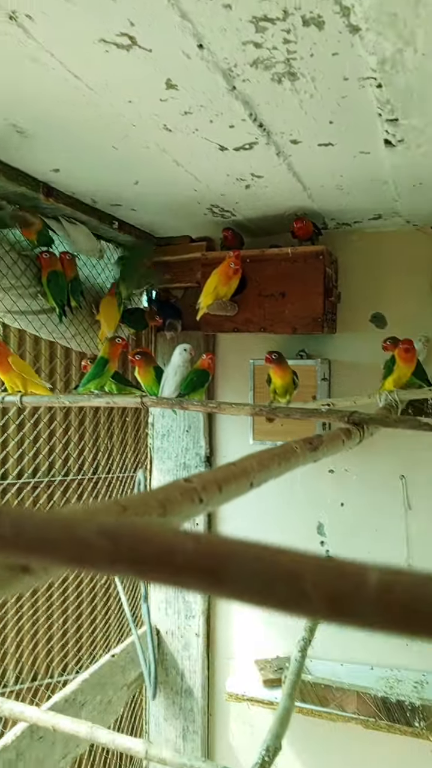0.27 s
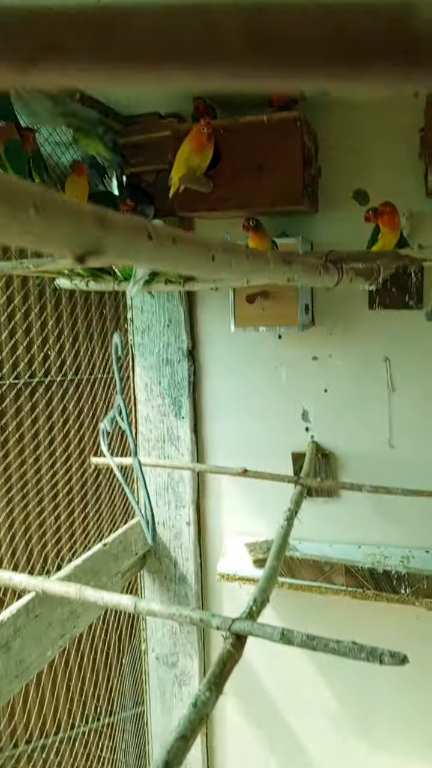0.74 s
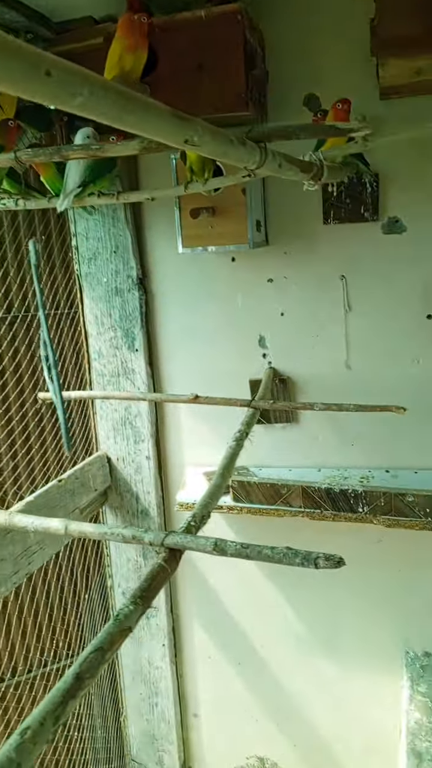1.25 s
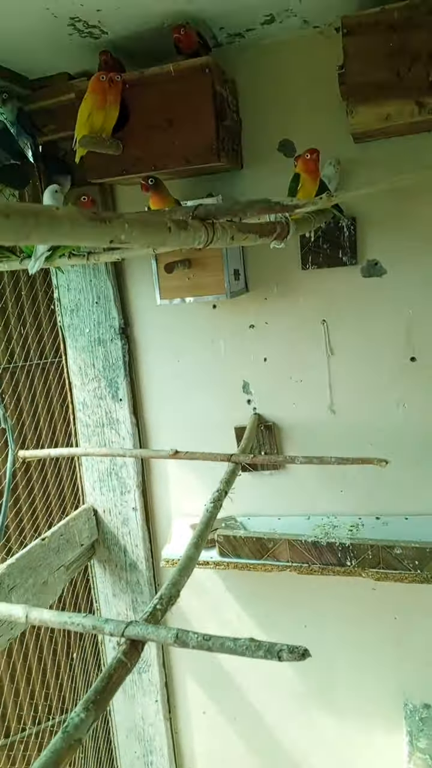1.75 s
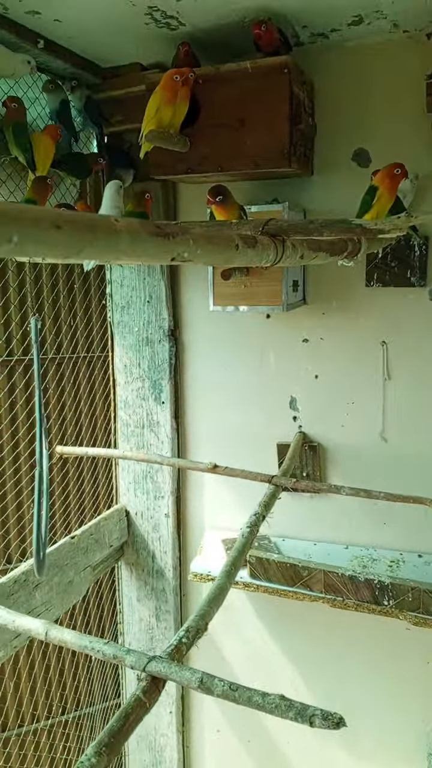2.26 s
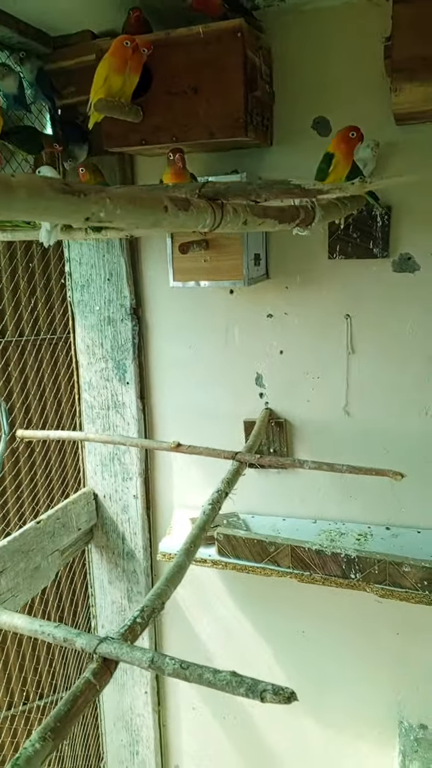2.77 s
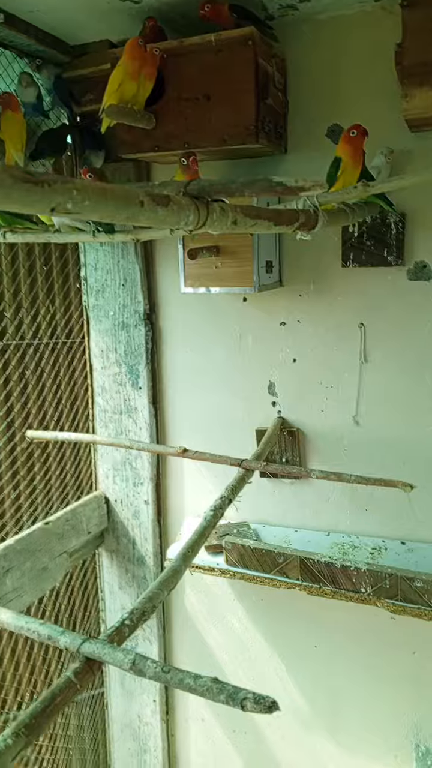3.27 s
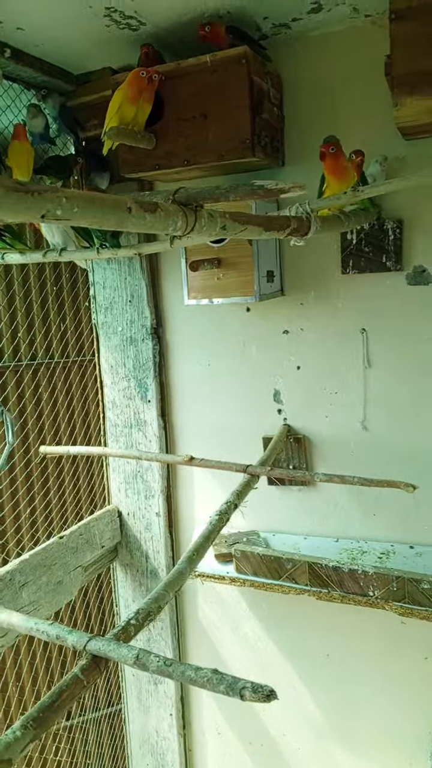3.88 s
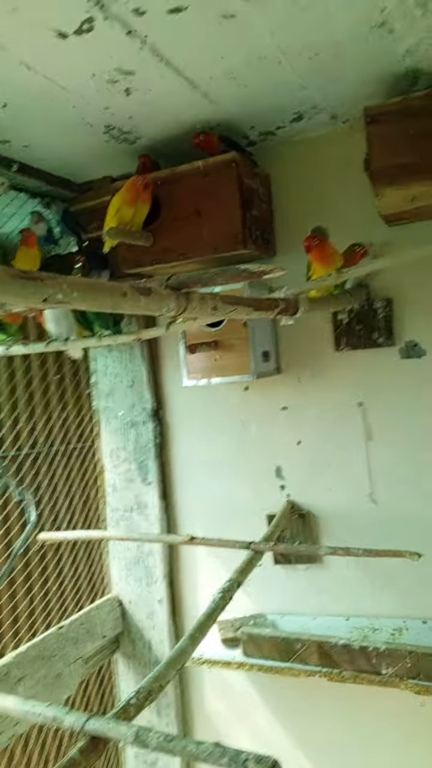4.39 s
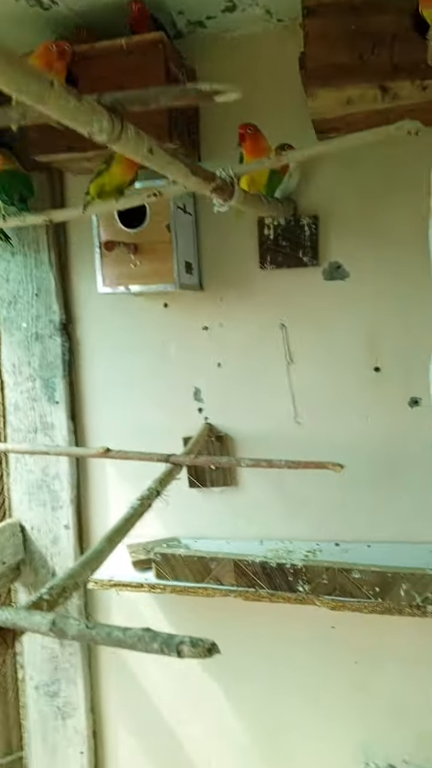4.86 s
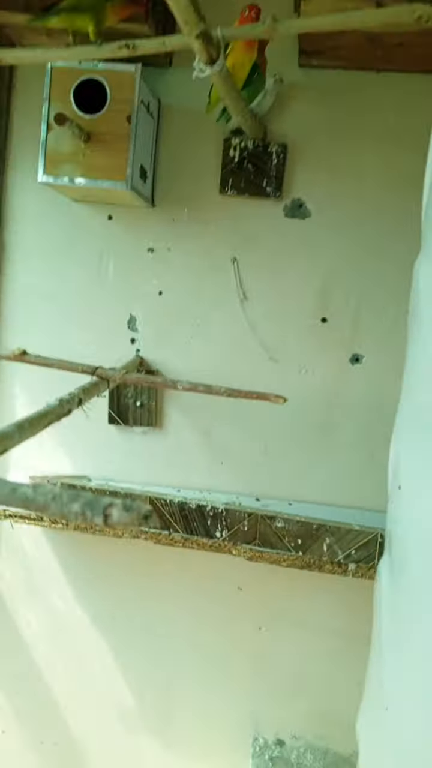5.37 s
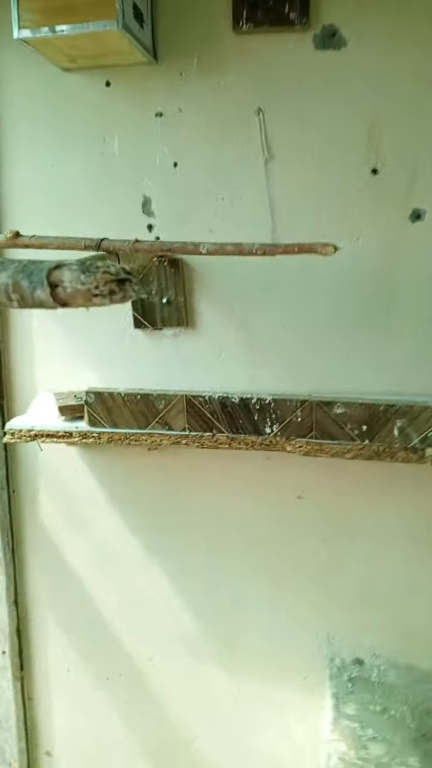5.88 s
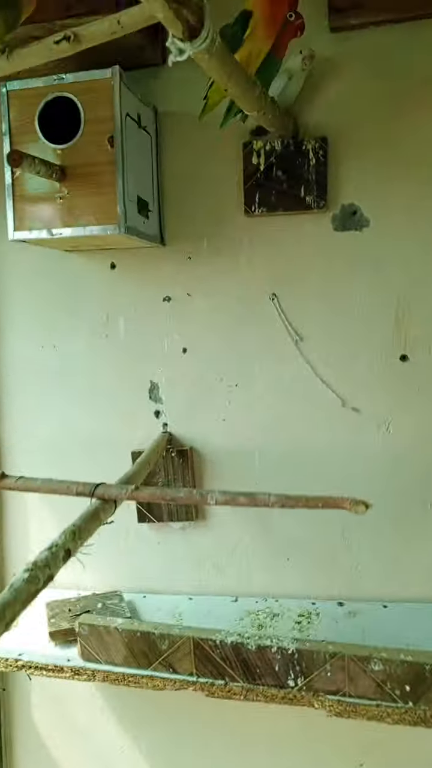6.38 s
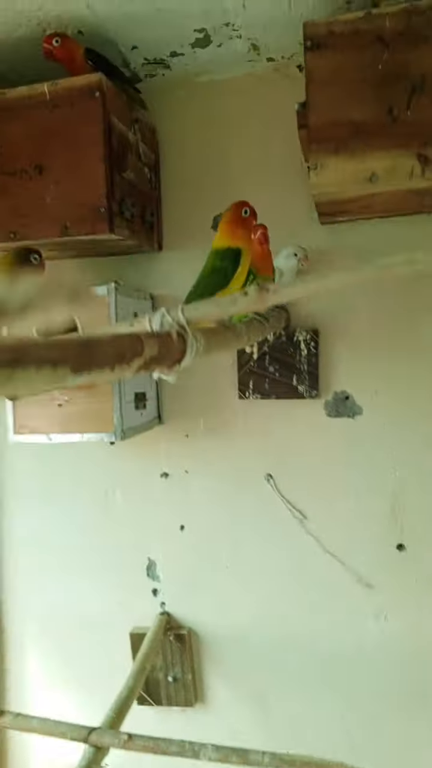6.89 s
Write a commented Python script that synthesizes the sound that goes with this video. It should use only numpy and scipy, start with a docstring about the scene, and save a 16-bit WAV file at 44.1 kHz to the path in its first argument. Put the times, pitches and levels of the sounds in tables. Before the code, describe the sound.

A small bare-walled aviary with a short, bright echo and a low, wavering room murmur. Two faint wing flicks come first, then from about 0.3 s small parrots chatter: a hoarse burst, then brief squawks mixed with chirps leaping up to a thin whistle near 6 kHz. Between 1.4 and 2.3 s it is dense and raspy; from 2.3 to 3.6 s short, nasal squawks follow in quick succession, with faint wooden ticks and soft feather rustle. From 3.7 to 4.4 s one bird gives nine even falling yaps, about eleven a second, ending in a squawk and chirp. Then calls thin out: wing flicks near 5 s, a sharp chirp at 5.2, a microphone click at 5.4, a squawk at 5.7. Low grip rumble swells around 5.9 and 6.5 s, the latter with fluttering feathers. A strong chirp at 6.8 s, a rattling trill at 6.95 and a loud final chirp end it.

```python
"""A bare-walled aviary: small parrots chatter with harsh squawks, falling yaps, chirps that shoot up to a
whistle, and one trill. Every call is a stack of shaky overtones with breath noise, and wall echoes smear it.
Wings are puffs of noise over a soft rustle; ticks and bumps on perches and microphone are clicks that ring.
A hand-held microphone rumbles over a low room murmur, both made of shaped noise that rises and falls."""
import sys
import numpy as np
from scipy import signal
from scipy.fft import rfft, irfft
from scipy.io import wavfile

SR = 44100
rng = np.random.default_rng(int(sys.argv[2]) if len(sys.argv) > 2 else 0)


def unload_audio(sound):
    """Save the sound as a 16-bit wav file, at the path given as the first command line argument."""
    columns = np.transpose(np.atleast_2d(sound))
    # keep every value between -1 and 1, then stretch to whole-number steps
    steps = np.round(np.clip(columns, -1, 1) * 32767)
    wavfile.write(sys.argv[1], SR, steps.astype(np.int16))


def nominal_scale(level):
    """Amplitude ratio for a level in decibels (scalar or array-like)."""
    x = np.asarray(level, float) / 20
    return 10 ** x


N = 314874   # length in samples


def rms_one(x):
    """Scale a signal to an average strength (rms) of 1."""
    return x / np.sqrt(np.mean(x ** 2) + 1e-20)


def in_time(rows):
    """Join the points of a (t/s, value) table by straight lines, one value a sample."""
    t, values = np.transpose(rows)
    return np.interp(np.arange(N) / SR, t, values)


def at_hz(points, hz):
    """Read a table at any frequency, along a logarithmic frequency axis."""
    table_hz, values = np.transpose(points)
    return np.interp(np.log(hz), np.log(table_hz), values)


def wobble(rate_hz):
    """Random drift: noise smoothed by two equal low-pass steps, scaled to rms 1."""
    r = np.exp(-2 * np.pi * rate_hz / SR)
    return rms_one(signal.lfilter([1], [1, -2 * r, r * r], rng.standard_normal(N)))


def coloured(spectrum, low_hz, high_hz):
    """Noise shaped by a spectrum table; its part between the two edges has rms 1."""
    hz = np.fft.rfftfreq(N, 1 / SR) + 1
    lines = rfft(rng.standard_normal(N)) * nominal_scale(at_hz(spectrum, hz))
    inside = irfft(lines * (hz > low_hz) * (hz < high_hz), N)
    return irfft(lines, N) / np.std(inside)


# loudness of the room murmur: (t/s, level/dB)
MURMUR_LEVEL = [(0.0, -64.5), (0.38, -56.5), (4.83, -58.5), (4.97, -60), (6.14, -60.5), (7.14, -50)]
# tone colour of the room murmur: (f/Hz, relative level/dB)
MURMUR_COLOUR = [(88, -26), (150, -7), (702, -9), (998, -9), (1760, -16.5), (2810, -19), (4670, -23),
                 (10800, -25.5), (12400, -31), (16000, -69)]


def room_murmur():
    """The room's background is mostly low noise whose level drifts at random."""
    level_db = in_time(MURMUR_LEVEL) + 3.1 * wobble(11.0)
    return nominal_scale(level_db) * coloured(MURMUR_COLOUR, low_hz=289.7, high_hz=1400)


# steady rumble of the hand on the microphone: (t/s, level/dB)
HAND_LEVEL = [(0.0, -67), (.87, -56.5), (.95, -67), (3.5, -72.5), (4.73, -56), (4.95, -70), (6.4, -58.5),
              (6.7, -55.5), (7.14, -55)]
# shifts of the grip, each a short swell of rumble: (t/s, level/dB)
GRIP_SHIFTS = [(3.25, -59), (3.4, -58), (5.375, -55), (5.53, -64), (5.84, -52), (5.95, -48), (6.14, -52.5),
               (6.33, -59), (6.56, -43), (6.98, -56)]
# tone colour of the rumble: (f/Hz, relative level/dB)
RUMBLE_COLOUR = [(15, -54), (25, -23), (92, 0.5), (151, -6.5), (306, -10), (336, -20.5), (400, -9.5),
                 (520, -52), (880, -120)]
GRIP_S = 0.031   # from the top of a swell down to 1/e


def handling():
    """A hand rubbing the microphone makes low noise, which swells whenever the grip shifts."""
    t = np.arange(N) / SR
    swells = sum(nominal_scale(db) * np.exp(-((t - s) / GRIP_S) ** 2) for s, db in GRIP_SHIFTS)
    loudness = nominal_scale(in_time(HAND_LEVEL)) + swells
    unsteady = nominal_scale(2.3 * wobble(29.0))
    return loudness * unsteady * coloured(RUMBLE_COLOUR, low_hz=40, high_hz=150)


# wing flicks: (t/s, level/dB)
WING_FLICKS = [(0.0986, -50), (.151, -49), (4.789, -54), (4.904, -52), (5.088, -57.5), (5.1285, -52),
               (5.578, -50.5), (5.78, -45), (5.8194, -58.5), (6.463, -45), (6.4946, -52), (6.5198, -44),
               (6.595, -49), (6.665, -47)]
# soft rustle in the treble between the calls: (t/s, level/dB)
RUSTLE_LEVEL = [(0, -67), (.2, -65), (.5, -57.5), (4.4, -53), (4.7, -59.5), (4.95, -55), (5.05, -97),
                (5.6, -61), (5.85, -57), (6.1, -87), (6.42, -79), (6.5, -55.5), (6.8, -67)]
# tone colour of the feathers: (f/Hz, relative level/dB)
FEATHER_COLOUR = [(290, -36.5), (500, -14), (1650, -0.5), (1990, -7.5), (2680, -2), (5780, -14),
                  (10700, -13), (15000, -35.5)]


def wings():
    """Feathers rub the air: each flick is a fast-dying puff of noise over a softer rustle."""
    flicks = np.zeros(N)
    for s, db in WING_FLICKS:
        flicks[int(s * SR)] = nominal_scale(db)
    t = np.arange(SR // 10) / SR
    puff_shape = np.minimum(t / 0.0012, 1) * np.exp(-t / 0.0138)
    puffs = signal.fftconvolve(flicks, puff_shape)[:N]
    rustle = nominal_scale(in_time(RUSTLE_LEVEL) + 3.8 * wobble(25.))
    return (puffs + rustle) * coloured(FEATHER_COLOUR, low_hz=2000, high_hz=12000)


# tone colour of the breath rasp: (f/Hz, relative level/dB)
RASP_COLOUR = [(1500, -35), (2300, -4.5), (4500, 5.5), (6000, -5.5), (8000, -9.5), (11000, -4.5),
               (14000, -32.5), (16000, -56.5)]


def voice_chance():
    """An unsteady voice needs three random signals: pitch shake, strength shake and breath noise."""
    pitch_shake = np.tanh(wobble(563.0) / 1.58) * 1.8
    strength_shake = np.tanh(wobble(350.) / 1.46) * 1.865
    breath = coloured(RASP_COLOUR, low_hz=1494, high_hz=14000)
    return np.array([pitch_shake, strength_shake, breath])


def note(s, length, chance, fade_db, close=0.069):
    """Place, clock, chance and envelope of one note: a sharp start, a drift of level, a quick close."""
    at = int(s * SR)
    t = np.arange(min(int(length * SR), N - at)) / SR
    start = np.minimum(t / 0.0033, 1)
    end = np.clip((length - t) / (close * length), 0, 1)
    envelope = start * nominal_scale(-fade_db * t / length) * end
    return slice(at, at + len(t)), t, chance[:, at:at + len(t)], envelope


# throat, beak and microphone colour of the overtones: (f/Hz, relative level/dB)
THROAT_COLOUR = [(1500, 6), (2100, -12), (3200, -4), (4600, -2.5), (6300, -2), (8000, -11), (10500, -10.5),
                 (12500, -18.5), (14000, -40.5), (16000, -56)]


def syrinx(pitch, rough, chance, tilt_db, rasp_db):
    """A bird's voice organ: overtones weighted by the throat, plus breath; roughness shakes the overtones."""
    pitch_shake, strength_shake, breath = chance
    pitch = pitch * np.exp((0.0066 + 0.0897 * rough) * pitch_shake)
    phase = 2 * np.pi * np.cumsum(pitch) / SR
    stack = 0
    for k in range(1, 8):
        strength = nominal_scale(at_hz(THROAT_COLOUR, k * pitch) + tilt_db * np.log2(k))
        low_enough = k * pitch < SR / 2.5
        stack = stack + strength * low_enough * np.sin(k * phase)
    rasp = nominal_scale(rasp_db + 2.87 * strength_shake) * breath
    return stack * nominal_scale(7.62 * rough * strength_shake) + rasp


# squawks: (t/s, length/s, first f/Hz, last f/Hz, level/dB); pitches are those before the arch
SQUAWK_NOTES = [(.26, .012, 1950, 2240, -30), (.268, 0.043, 2212, 2256, -11.5),
                (.375, .062, 3600, 3300, -22), (.558, 0.016, 2523, 2624, -17),
                (.713, 0.033, 2495, 2604, -18.5), (.873, 0.032, 2620, 2886, -19),
                (1.003, .011, 3270, 3530, -17), (1.092, 0.0059, 2524, 2550, -16.5),
                (1.163, 0.011, 2555, 2600, -25.5), (1.23, .018, 2530, 2510, -19.5),
                (1.296, 0.019, 3170, 3500, -16.5), (1.353, 0.016, 4280, 5050, -26),
                (1.385, 0.02, 2145, 2086, -20), (1.477, 0.016, 3680, 4320, -21.5),
                (1.623, 0.033, 4690, 3890, -21.5), (1.777, .021, 3020, 3110, -16),
                (1.821, .018, 4300, 4600, -25), (1.837, 0.029, 2680, 2560, -18),
                (1.889, 0.068, 2400, 2280, -16.5), (1.993, 0.03, 2503, 2265, -15.5),
                (2.048, .025, 4600, 4200, -24), (2.08, .026, 2314, 1910, -18.5),
                (2.107, .025, 4800, 4600, -23), (2.164, .025, 2810, 1992, -13),
                (2.227, 0.017, 2556, 2310, -21.5), (2.244, 0.022, 3410, 2243, -17),
                (2.268, .035, 2226, 2340, -16.5), (2.348, 0.036, 2712, 1977, -19.5),
                (2.416, 0.0089, 2570, 2300, -11.5), (2.44, 0.047, 2265, 1930, -16),
                (2.551, 0.019, 2502, 2000, -11.5), (2.61, .018, 2145, 2080, -31),
                (2.63, 0.045, 2156, 2076, -17.5), (2.709, 0.022, 2193, 2060, -16.5),
                (2.743, 0.013, 2274, 2380, -15.5), (2.785, 0.025, 2142, 2082, -17.5),
                (2.829, 0.02, 2298, 2247, -16), (2.867, 0.015, 2230, 2360, -18.5),
                (2.908, .01, 3500, 3500, -26), (2.917, .045, 2233, 2347, -21.5),
                (2.982, 0.0091, 3600, 3300, -26), (3.006, 0.018, 2187, 2476, -20),
                (3.057, 0.0064, 3390, 3480, -26), (3.08, 0.0334, 2216, 2434, -22),
                (3.125, 0.0097, 3300, 3160, -31.5), (3.154, 0.028, 2217, 2357, -24.5),
                (3.188, 0.011, 2280, 2230, -17.5), (3.227, 0.013, 2285, 2070, -19),
                (3.262, 0.024, 2328, 2250, -23.5), (3.3, .022, 2260, 2260, -18.5),
                (3.345, .018, 3050, 3100, -27), (3.364, 0.022, 2333, 2510, -15.5),
                (3.42, .015, 3100, 3150, -28), (3.451, .026, 2264, 2196, -23.5),
                (3.486, 0.019, 2095, 1980, -24), (3.526, 0.018, 2137, 2050, -16.5),
                (3.564, 0.017, 2270, 2106, -21.5), (3.604, 0.022, 2330, 1893, -16),
                (3.64, .023, 2100, 2110, -27), (4.456, 0.046, 2359, 2476, -13.5),
                (4.465, 0.069, 2544, 2010, -24.5), (5.211, 0.0077, 2460, 2390, -15),
                (5.674, .016, 2400, 2150, -20), (6.804, 0.012, 2223, 2380, -17),
                (6.918, 0.035, 2417, 2490, -15), (7.093, 0.0075, 2325, 2350, -9)]
# falling yaps repeated by one bird, each after a faint high pip: (t/s, level/dB)
YAP_NOTES = [(3.678, -16.5), (3.765, -18.5), (3.85, -14.5), (3.938, -13), (4.03, -15), (4.118, -18.5),
             (4.206, -17), (4.298, -16), (4.388, -15.5)]
# how hoarse the flock is at full voice: (t/s, roughness from 0 to 1)
HOARSENESS = [(.3, 0.19), (.38, .9), (.5, .45), (1.0, .45), (1.08, .15), (1.3, .2), (1.36, 0.35),
              (1.7, 0.49), (1.77, .25), (1.9, .4), (2.0, .2), (2.1, .6), (2.42, 0.71), (2.6, .4),
              (4.45, .36), (4.5, .7), (5.3, 0.18), (5.7, 0.57), (6.85, 0.43), (7.1, .15)]
YAP_S, YAP_FIRST_HZ, YAP_LAST_HZ = .037, 2750, 1880
PIP_AHEAD_S, PIP_S, PIP_HZ, PIP_DB = .018, 0.0096, 3100, -42
FULL_VOICE_DB, ROUGH_PER_DB = -16, .025   # notes weaker than full voice are rougher
RASP_DB, RASP_DB_PER_ROUGH = -28, 30   # breath rasp grows with roughness
ARCH = .05   # the pitch bends up by this share in the middle


def squawks(chance):
    """The pitch holds at first and slides faster towards the end; rough notes rasp more."""
    out = np.zeros(N)
    yaps = [(s, YAP_S, YAP_FIRST_HZ, YAP_LAST_HZ, db) for s, db in YAP_NOTES]
    pips = [(s - PIP_AHEAD_S, PIP_S, PIP_HZ, PIP_HZ, PIP_DB) for s, db in YAP_NOTES]
    for s, length, first_hz, last_hz, level_db in SQUAWK_NOTES + yaps + pips:
        place, t, part, envelope = note(s, length, chance, fade_db=4.)
        weakness_db = max(FULL_VOICE_DB - level_db, 0)
        rough = np.interp(s, *np.transpose(HOARSENESS)) + ROUGH_PER_DB * weakness_db
        rough = np.clip(rough, 0, 1.2)
        slide = (last_hz / first_hz) ** ((t / length) ** 1.9)
        arch = 1 + ARCH * (np.sin(np.pi * t / length) - 2 / np.pi)
        rasp_db = RASP_DB + RASP_DB_PER_ROUGH * rough
        voice = syrinx(first_hz * slide * arch, rough, part, tilt_db=-1.35, rasp_db=rasp_db)
        out[place] += nominal_scale(level_db) * envelope * voice
    return out


# how long the wall echoes take to fall by 60 dB: (f/Hz, fall time/s)
WALL_FALL = [(100, 0.2), (2000, 0.17), (6000, 0.18), (14000, 0.089)]


def aviary(x):
    """Hard walls give dense echoes: noise dying octave by octave, starting just after the direct sound."""
    t, echoes = np.arange(SR // 2) / SR, 0
    for low in 60 * 2. ** np.arange(8):
        octave = signal.butter(2, [low, 2 * low], "band", fs=SR, output="sos")
        noise = signal.sosfilt(octave, rng.standard_normal(len(t)))
        echoes = echoes + noise * nominal_scale(-60 * t / at_hz(WALL_FALL, 1.1 * low))
    echoes *= np.clip((t - .002) / 0.001, 0, 1)
    echoes *= 1 + 2.6 * np.exp(-t / 0.0036)   # the earliest echoes are stronger
    return signal.fftconvolve(x, echoes / np.sqrt(np.sum(echoes ** 2)))[:N]


# chirps that shoot up and hold a whistle: (t/s, length/s, top f/Hz, level/dB, breath rasp level/dB)
CHIRP_NOTES = [(0.295, 0.099, 6300, -13.5, -6.5), (.557, .052, 6430, -12.5, -25),
               (.718, .055, 6450, -11.5, -21.5), (0.887, 0.042, 6445, -12.5, -23.5),
               (0.996, .036, 7010, -15, -17), (1.38, 0.047, 6340, -16, -18.5), (1.512, .043, 6180, -15, -7),
               (1.678, 0.054, 6160, -13.5, -7.5), (1.839, 0.036, 6030, -13.5, -10.5),
               (1.895, .031, 5830, -13, -12.5), (1.926, .097, 6070, -13.5, -15.5),
               (2.269, .034, 5875, -17.5, -7.5), (3.358, 0.054, 6270, -18, -11.5),
               (3.727, 0.042, 6160, -10.5, -21), (4.4, .087, 6330, -14.5, -12.5),
               (5.212, .028, 6050, -13, -20), (6.801, .042, 6160, -9, -25.5),
               (7.099, .022, 6200, -6.5, -20.5)]
CHIRP_START_HZ = 3400
CLIMB_SHARE, CLIMB_SOFTER_DB = .39, 9   # part of a chirp spent climbing, and how much softer it starts
ROUGH_CLIMB, ROUGH_TOP, ROUGH_END = .9, .3, .1   # roughness along a chirp


def chirps(chance):
    """Soft and rough while the pitch climbs, loud and clearer on top."""
    out = np.zeros(N)
    for s, length, top_hz, level_db, rasp_db in CHIRP_NOTES:
        # a negative fade makes the note grow
        place, t, part, envelope = note(s, length, chance, fade_db=-2.0, close=0.27)
        climb = np.sin(np.pi / 2 * np.clip(t / (CLIMB_SHARE * length), 0, 1)) ** 2
        pitch = CHIRP_START_HZ * (top_hz / CHIRP_START_HZ) ** climb
        rough = np.interp(t / length, [0, CLIMB_SHARE, .65, 1],
                          [ROUGH_CLIMB, ROUGH_TOP, ROUGH_TOP, ROUGH_END])
        voice = syrinx(pitch, rough, part, tilt_db=1.0, rasp_db=rasp_db)
        out[place] += nominal_scale(level_db - CLIMB_SOFTER_DB * (1 - climb ** 2)) * envelope * voice
    return out


# ticks and bumps on wood and on the microphone: (t/s, starting level/dB, f/Hz, time to fall by 60 dB/s)
KNOCK_HITS = [(0.421, -39, 284.5, 0.11), (2.15, -36.5, 424, 0.062), (2.8, -40.5, 287, 0.1),
              (2.416, -39, 960, 0.031), (2.619, -41, 700, 0.12), (3.182, -29, 1260, 0.025),
              (3.308, -39, 914, 0.066), (3.422, -35.5, 876, 0.063), (4.247, -26, 452, 0.024),
              (4.247, -24, 1120, 0.0075), (4.786, -30.5, 1034, 0.035), (5.375, -16, 1400, 0.0043),
              (5.375, -20, 100.2, 0.011), (5.929, -31.5, 110.4, 0.11), (5.952, -23.5, 130, 0.031),
              (6.813, -30.5, 645, 0.046), (6.826, -18.5, 244, 0.01), (7.109, -17, 777, 0.0035)]


def knocks():
    """A click sets one tone ringing, and the ringing dies away."""
    out, t = np.zeros(N + SR), np.arange(SR // 4) / SR
    for s, level_db, hz, fall_s in KNOCK_HITS:
        ring = nominal_scale(level_db - 60 * t / fall_s) * np.sin(2 * np.pi * hz * t)
        # harder contacts, which ring higher, tick more
        ring[:2] += nominal_scale(level_db + 1.0) * hz / 1400 * np.array([1, -1])
        at = int(s * SR)
        out[at:at + len(t)] += ring
    return out[:N]


TRILL_AT_S, TRILL_S, TRILL_HZ, TRILL_DB, TRILL_FADE_DB = 6.947, 0.14, 2600, -14.5, 3.5
TRILL_SAG_S, TRILL_END_HZ, TRILL_SAG_DB = .036, 2050, 3.5   # the trill droops as it ends
TRILL_PER_S, TRILL_ROUGH = 120, .4   # throbs a second, roughness


def trill(chance):
    """A held squawk chopped by a fast throb, drooping in pitch and level at the end."""
    out = np.zeros(N)
    place, t, part, envelope = note(TRILL_AT_S, TRILL_S, chance, fade_db=TRILL_FADE_DB)
    droop = np.clip(1 - (TRILL_S - t) / TRILL_SAG_S, 0, 1)
    throb = np.cos(np.pi * TRILL_PER_S * (t - .0105)) ** 4
    pitch = TRILL_HZ * (TRILL_END_HZ / TRILL_HZ) ** droop
    voice = syrinx(pitch, TRILL_ROUGH, part, tilt_db=-1.5, rasp_db=-16.0)
    out[place] = nominal_scale(TRILL_DB - TRILL_SAG_DB * droop) * envelope * throb * voice
    return out


def scene():
    """Birds and knocks with their wall echoes, plus wings, rumble and murmur."""
    chance = voice_chance()
    birds = squawks(chance) + chirps(chance) + trill(chance)
    # a small beak radiates no lows
    birds = signal.sosfilt(signal.butter(6, 1600, "high", fs=SR, output="sos"), birds)
    taps = knocks()
    echoes = aviary(nominal_scale(-4.5) * birds + nominal_scale(-23.5) * taps)
    mix = birds + taps + echoes + wings() + handling() + room_murmur()
    return mix[None]   # one channel


def band_limit(x):
    """A steep low-pass at the top of the band."""
    return signal.sosfilt(signal.butter(12, 16470, fs=SR, output="sos"), x)


MIC_LOW_HZ, MIC_TOP_HZ = 42, 14800


def record(dry):
    """The microphone weakens the deepest and highest sounds; loud peaks are rounded a little."""
    microphone = signal.butter(5, [MIC_LOW_HZ, MIC_TOP_HZ], "band", fs=SR, output="sos")
    heard = signal.sosfilt(microphone, dry)
    mix = 1.017 * np.tanh(heard / 1.033)
    return band_limit(mix)


dry = scene()
out = record(dry)
unload_audio(out)
```